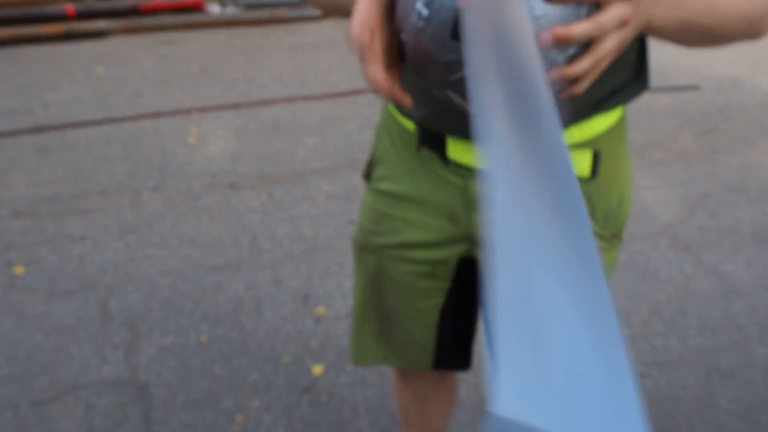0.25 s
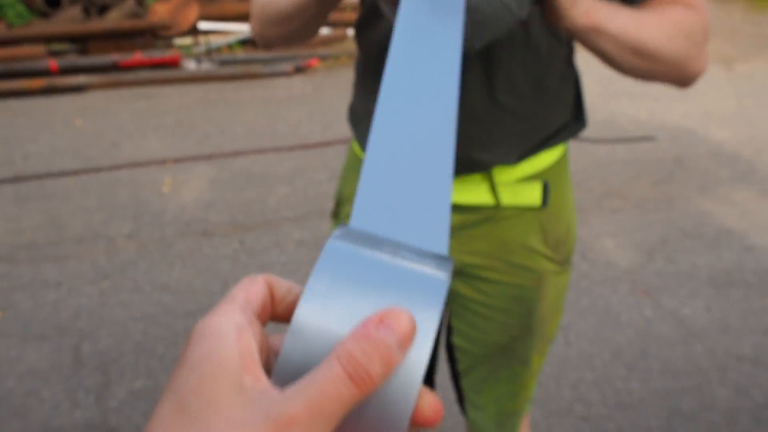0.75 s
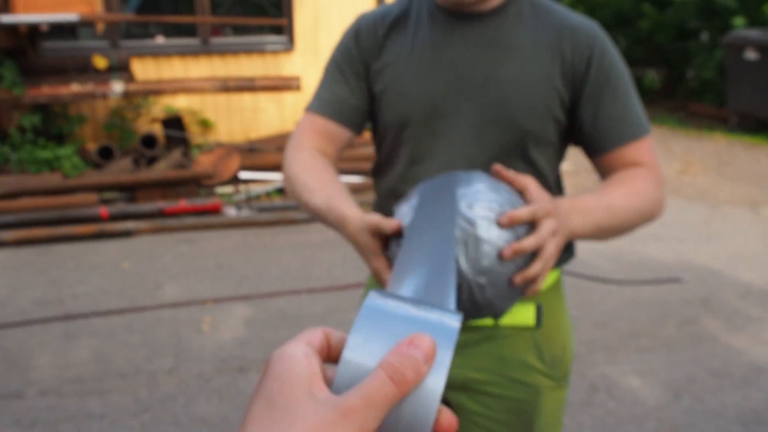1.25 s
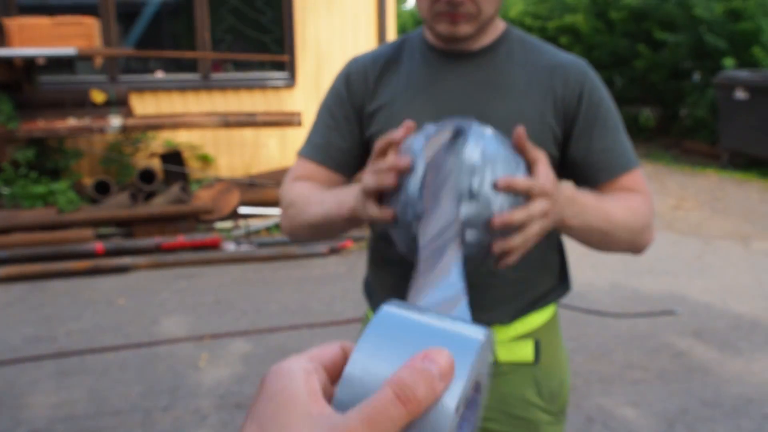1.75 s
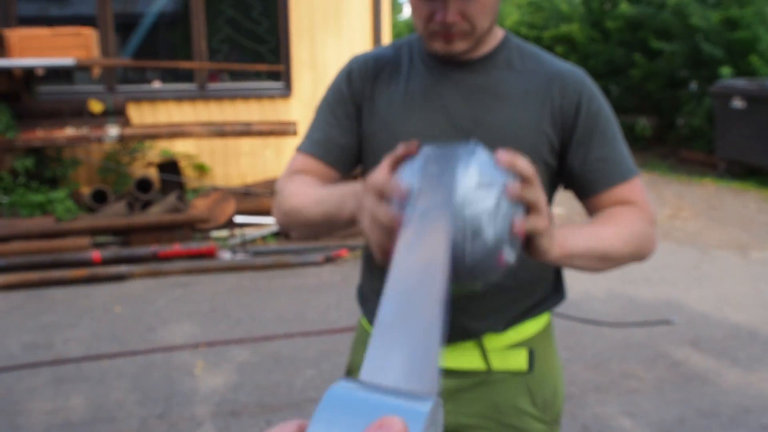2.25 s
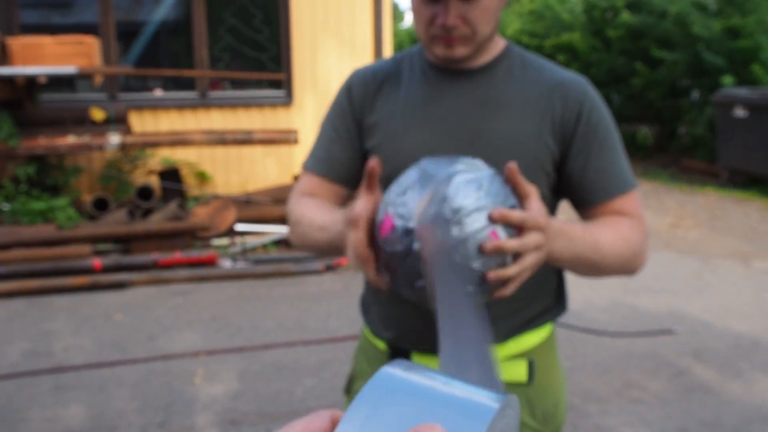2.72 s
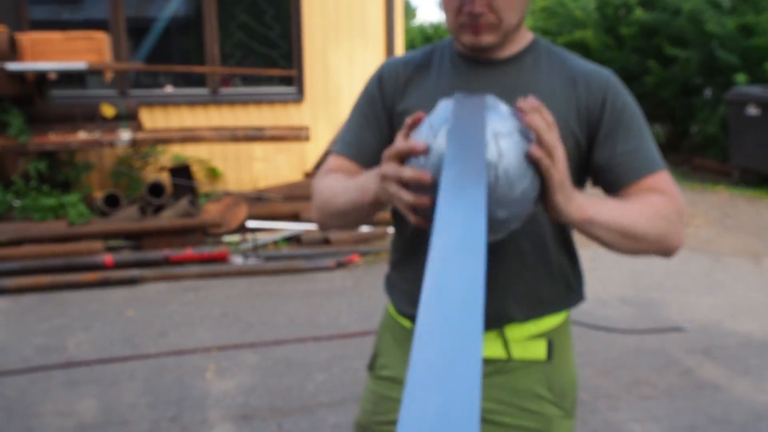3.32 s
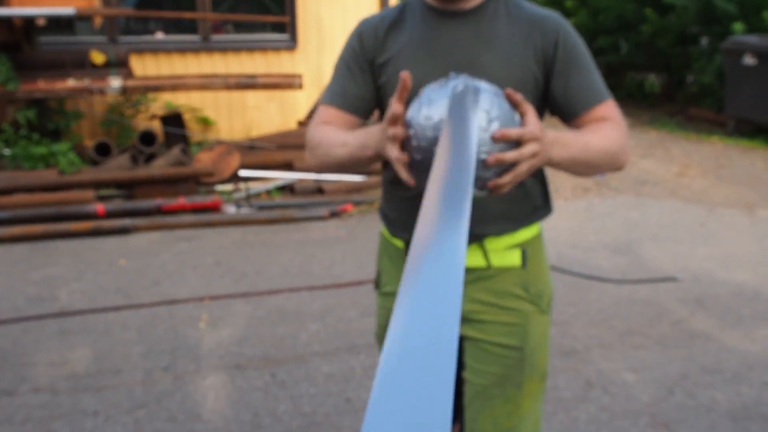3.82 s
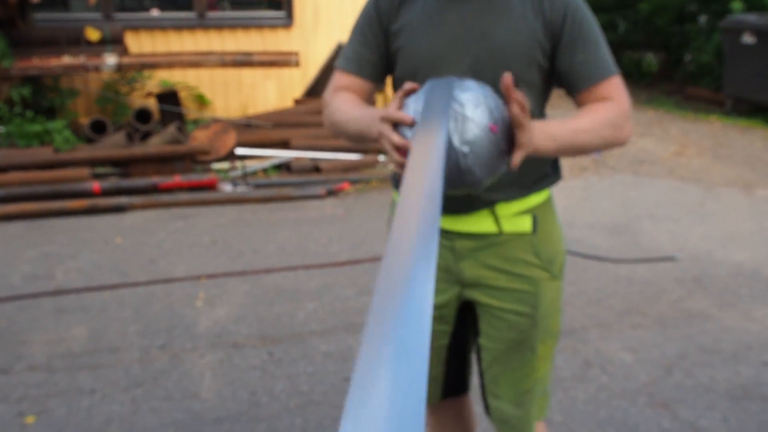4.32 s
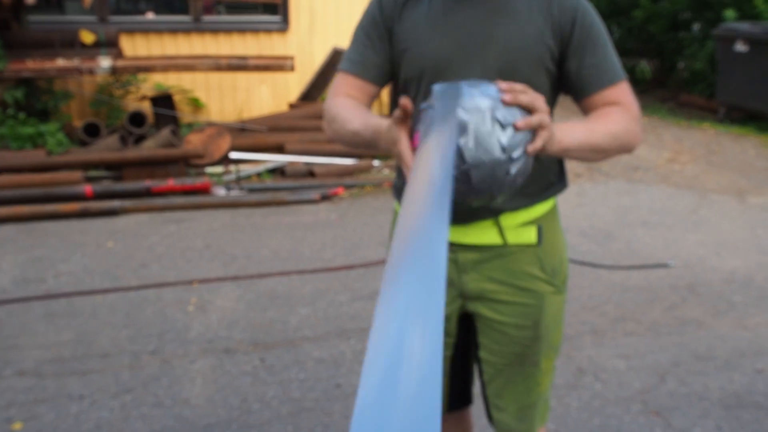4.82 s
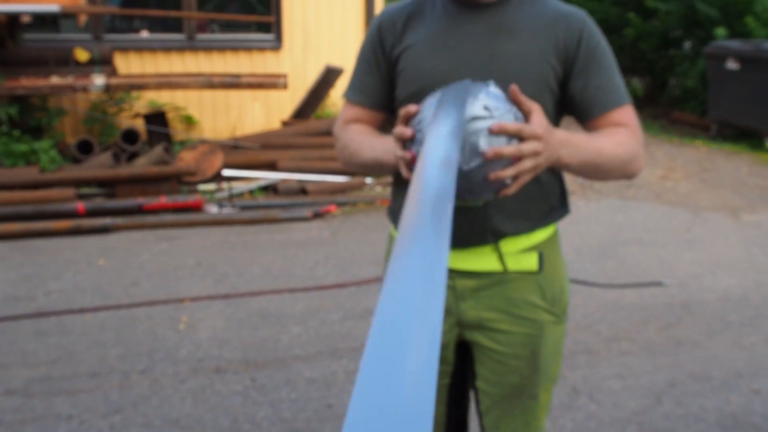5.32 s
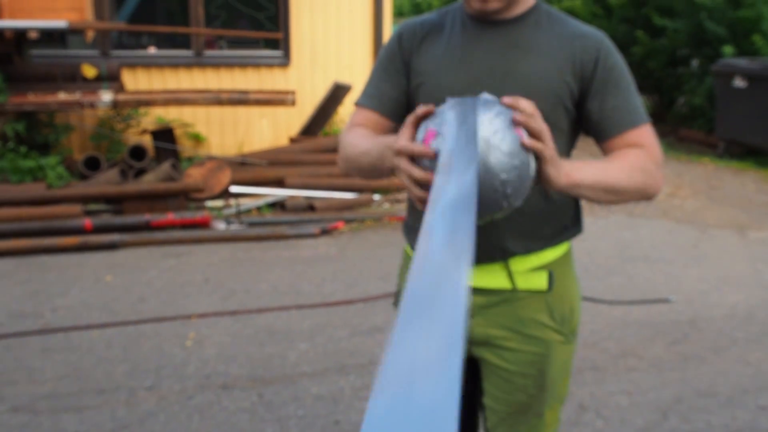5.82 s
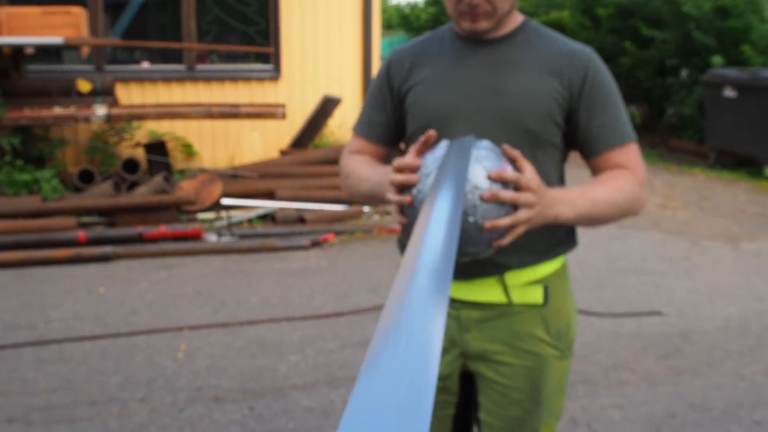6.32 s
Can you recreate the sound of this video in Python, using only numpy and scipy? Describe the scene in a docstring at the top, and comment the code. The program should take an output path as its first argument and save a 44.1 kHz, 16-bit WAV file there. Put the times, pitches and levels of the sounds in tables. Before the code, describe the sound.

Close, crackling rips of sticky tape being unrolled in bursts, over an engine that slows and pulls away and faint road noise.

```python
"""Outdoors, duct tape is pulled off a hand-held roll, close to a small stereo microphone.
The glue lets go in stick-slip bursts, each a tiny tear that shakes the taut strip; now and then
the slack strip snaps tight and rings the hollow roll. Behind it a motorcycle-like engine slows down,
then pulls away through a gear change, over the far roar of a road and a faint high whistle."""
import sys
import numpy as np
from scipy import signal
from scipy.io import wavfile

SR = 44100
rng = np.random.default_rng(int(sys.argv[2]) if len(sys.argv) > 2 else 0)


def unload_wav(signal):
    """Save mono or channel-first audio to the path in sys.argv[1] as 16-bit WAV at rate SR, clipped to [-1, 1]."""
    wavfile.write(
        sys.argv[1],
        SR,
        np.round(np.clip(np.atleast_2d(signal).T, -1, 1) * 32767).astype(np.int16),
    )


N = 289296
TIME = np.arange(N) / SR


def tape(tear_s, release_t60, colour_db, ring_db, ring_cycles, side_db, rise, crack_db, knock_db, hiss_db):
    """Each slip is a brief ragged tear that strikes every resonance of the strip with new strength."""
    # broad resonances of strip and roll: f/Hz, width/Hz, level/dB
    modes = [(191, 106, -1), (454, 59, 1.5), (830, 730, 1), (1435, 1290, 1), (2470, 440, 3), (3285, 436, 2),
             (4320, 950, -2.5), (6670, 1800, -5), (8700, 2580, -4.5), (14000, 3600, -10.5)]
    # the lows fall back as the free strip grows long: t/s, level/dB
    body = [(2.3, -0.5), (3.5, -1)]
    big_s, big_db = big_slips()
    small_at, small_db, motion = small_slips(big_s, uneven_db=2.5, reload_s=.004)
    at = np.append((big_s * SR).astype(int), small_at)
    level_db = np.append(big_db, small_db)
    thin_db = 1.04 * np.minimum(big_db + 18, 0)   # big slips under -18 dB hardly move the strip
    low_db = np.append(thin_db, np.zeros(len(small_at))) + in_time(body)[0][at]
    low_db += knock_db * rng.standard_normal(len(at))
    stop = at + (tear_s * SR * rng.uniform(0.68, 0.85, len(at))).astype(int)
    white = rng.standard_normal((2, N))
    ragged = amp(3.0 * rng.standard_normal(N // 8 + 1)).repeat(8)[:N]   # threads of glue part unevenly
    out = 0
    for k, (hz, width_hz, mode_db) in enumerate(modes):
        gain = amp(level_db + low_db * (hz < 2000) + colour_db * rng.standard_normal(len(at)))
        starts, ends = np.zeros((2, N))
        starts[at] = gain
        ends[stop] = gain
        crack = -amp(crack_db) * starts * [[1], [0]]   # a slip opens with one sharp jerk, dead centre
        tear = np.maximum(np.cumsum(starts - ends), 0) + dying(ends, release_t60)
        tear = signal.lfilter([rise], [1, rise - 1], tear)   # the tear takes a moment to run across
        ring = amp(ring_db) * dying(ends, .02 + ring_cycles / hz)   # the lows shake on for longer
        hiss = amp(hiss_db) * motion   # thin tearing under the small slips
        linger = amp(-5 * (hz > 5000)) * (ring + hiss)   # between slips the treble is damped
        mid, side = resonance(crack + white * (tear * ragged + linger), hz, width_hz)
        side *= amp(side_db + 3.5 * np.log2(hz / 4000))   # close mic ports differ only for short waves
        out += (-1) ** k * amp(mode_db + 5.0) * np.array([mid + side, mid - side])
    return out


def big_slips():
    """The glue line lets go in short, even runs; gives t/s and level/dB of each slip, faint lone ones included."""
    # runs of big slips: start t/s, slip count, spacing/ms, level/dB
    runs = [(0.2469, 1, 0, -23), (0.266, 2, 7.5, -18), (0.4865, 1, 0, -22), (0.533, 2, 11.5, -11),
            (0.5781, 2, 15.5, -14), (0.6066, 1, 0, -9), (0.6153, 3, 9, -10.5), (.651, 2, 8.5, -14),
            (0.6787, 4, 9, -11.5), (0.719, 1, 0, -19), (0.7406, 6, 8.5, -21), (1.3573, 3, 10, -14),
            (1.4203, 1, 0, -13), (1.4365, 3, 7.5, -12.5), (1.4848, 8, 9, -18.5), (1.5607, 2, 9.5, -23),
            (2.1969, 2, 12, -16.5), (2.2185, 2, 10, -14), (2.2667, 1, 0, -15.5), (2.2863, 3, 7.5, -14),
            (2.334, 3, 11, -14), (2.781, 2, 4.5, -20), (2.8037, 2, 33.5, -28.5), (3.1213, 2, 10.5, -16.5),
            (3.145, 2, 11.5, -12.5), (3.2178, 4, 8.5, -16.5), (3.27, 2, 11.5, -16), (3.2972, 2, 10, -16),
            (3.371, 2, 5.5, -15.5), (3.4521, 2, 17, -12.5), (3.5848, 3, 15.5, -17.5),
            (3.6417, 3, 14.5, -20), (3.842, 1, 0, -21), (3.8972, 2, 18, -17), (3.952, 5, 14, -17),
            (4.032, 3, 11, -15.5), (4.085, 5, 17.5, -17), (4.1648, 2, 13, -15.5), (4.1911, 3, 17, -15.5),
            (4.2686, 3, 15.5, -16), (4.4382, 2, 15, -14.5), (4.4903, 2, 11, -16), (4.546, 2, 12.5, -15.5),
            (4.59, 1, 0, -16.5), (4.8198, 2, 15, -14), (4.8776, 2, 18.5, -17.5), (5.007, 1, 0, -15),
            (5.043, 2, 15, -15), (5.1121, 1, 21, -17), (5.139, 2, 17, -16.5), (5.202, 2, 15.5, -14.5),
            (5.2371, 1, 0, -12), (5.2745, 4, 15.7, -16.5), (5.3615, 3, 22, -16), (5.46, 1, -6.5, -20),
            (5.6972, 2, 18, -12), (5.743, 2, 32, -28.5), (5.7897, 2, 16, -16), (5.85, 3, 14, -12),
            (5.883, 2, 11, -18.5), (5.9106, 1, -3.5, -15.5), (5.927, 3, 11, -19), (5.9588, 3, 8.5, -14.5),
            (6.0048, 3, 20, -17), (6.0808, 1, 8, -23.5)]
    # further lone slips, faint ones: t/s, level/dB
    faint_slips = [(0.18, -41), (1.2848, -39.5), (1.8845, -34), (2.733, -41), (3.0057, -35.5), (3.7151, -34),
                   (4.7645, -33), (6.235, -46)]
    slips = list(faint_slips)
    for start_s, count, spacing_ms, level_db in runs:
        for k in range(count):
            opening_db = -1.5 if k == 0 and count > 1 else 0   # a run opens with a weaker slip
            slips.append((start_s + k * spacing_ms / 1000, level_db + opening_db))
    return np.transpose(sorted(slips))


def small_slips(big_s, uneven_db, reload_s):
    """Nearly even small slips fade as the strain of the last big slip is spent."""
    last_big_s = big_s[np.maximum(np.searchsorted(big_s, TIME) - 1, 0)]
    pull_db, slips_per_s, slack_db_per_s = pulls()
    motion_db = pull_db - slack_db_per_s * np.maximum(TIME - last_big_s, 0)
    count = np.floor(np.cumsum(slips_per_s * amp(uneven_db * drift(60))) / SR)
    at = np.flatnonzero(np.diff(count))
    level_db = motion_db[at] + 0.48 * rng.standard_normal(len(at))
    gap_s = np.abs(TIME[at, None] - big_s).min(axis=1)
    sounding = (gap_s > reload_s) & (level_db > -100)   # the glue needs time to load again
    return at[sounding], level_db[sounding], amp(motion_db)


def pulls(top_share=0.74, fade_s=0.015):
    """Each pull keeps the strip moving: it swells to its top, then dies away into silence."""
    # pulls of the hand: start t/s, end t/s, top level/dB, slip rate/Hz, slackening/(dB/s)
    strokes = [(0.575, 0.8, -19.5, 140, 55), (1.36, 1.618, -17.5, 130, 95), (2.2, 2.431, -18, 160, 76),
               (3.122, 3.677, -20, 140, 6), (3.9, 4.323, -23, 120, 99), (4.439, 4.619, -26.5, 150, 250),
               (4.819, 4.927, -24, 150, 251), (5.01, 5.468, -24.5, 90, 201.5), (5.7, 6.095, -24.5, 90, 125)]
    level_db = np.full(N, -300.0)
    slips_per_s, slack_db_per_s = np.zeros((2, N))
    for start, end, top_db, rate, slack in strokes:
        pulling = (TIME > start) & (TIME < end + fade_s)
        corners_s = [start, start + top_share * (end - start), end, end + fade_s]
        level_db[pulling] = top_db + np.interp(TIME[pulling], corners_s, [-3.5, 0, -7, -35])
        slips_per_s[pulling] = rate
        slack_db_per_s[pulling] = slack
    return level_db, slips_per_s, slack_db_per_s


def snaps():
    """The slack strip snaps taut, and the jolt rings the hollow roll."""
    # jolts of the strip: t/s, level/dB
    hits = [(0.2703, -15.5), (0.2732, -11), (1.887, -26), (2.219, -23)]
    # hollow ring of the roll: f/Hz, width/Hz
    hollow = [(1150, 68), (1550, 270), (2450, 390)]
    jolts = np.zeros(N)
    for s, level_db in hits:
        jolts[int(s * SR)] = amp(level_db)
    bursts = dying(jolts, t60=0.028) * rng.standard_normal(N)
    return amp(10.0) * sum(resonance(bursts, hz, width_hz) for hz, width_hz in hollow)


def engine(waver, flutter_db, rasp_db):
    """Multiples of the cycle rate, shaped by firing pattern and exhaust; each firing also puffs noise."""
    # slowing, then pulling away: t/s, cycle rate/Hz, level/dB, low-note boost/dB
    ride = [(0, 60.65, -37.5, 7), (.55, 52.3, -34.5, 3), (1.0, 43.3, -39.5, -11), (1.3, 35.3, -35, -5.5),
            (1.8, 26.48, -42.5, 6), (2.12, 24.45, -36.5, 4), (2.59, 28.52, -35.5, 6), (3.0, 38.16, -22, 5),
            (3.22, 39.23, -24, 2.5), (3.49, 31.65, -32.5, 2), (3.62, 32.88, -27.5, 5.5),
            (4.4, 35.88, -26.5, 5.5), (5.2, 39.47, -25, 3), (5.65, 41.64, -22, -4.5),
            (5.9, 43.22, -26, -9.5), (6.15, 45.27, -23.5, -6.5), (6.56, 46.33, -23.5, 5)]
    # firing pattern: level/dB of multiples 1, 2, ...; the last holds for all higher ones
    firing_db = [-6, -4.5, -6.5, -3, -2, 0]
    # tone of the exhaust: f/Hz, level/dB
    exhaust = [(30, -33), (55, -7), (78, 3), (115, -4), (160, 0), (220, -5), (270, -19), (350, -36.5),
               (455, -17), (560, -52), (680, -23.5), (850, -58)]
    rate_hz, level_db, boost_db = in_time(ride)
    phase = 2 * np.pi * np.cumsum(rate_hz * (1 + waver * drift(8.08))) / SR
    drone = 0
    for k in range(1, 19):
        low_share = np.clip((115 - k * rate_hz) / 30, 0, 1)   # the boost fades in below 115 Hz
        gain_db = firing_db[min(k, len(firing_db)) - 1] + at_hz(exhaust, k * rate_hz)
        gain_db += low_share * boost_db + flutter_db * drift(4)
        drone += amp(gain_db) * np.sin(k * phase + .15 * k * k + .3 * drift(2))
    puffs = rng.standard_normal(N) * (1 + 0.4 * np.cos(phase))
    rasp = rms_one(steep(puffs, 398, 74))
    rasp += amp(10.5) * rms_one(steep(puffs, 169, 146))
    rasp += amp(-1.5) * rms_one(resonance(puffs, 510, 440))
    return amp(level_db) * (drone + amp(rasp_db) * rasp)


def whistle():
    """A faint, high, narrow band of noise that comes up near 2.9 s."""
    # swell of the whistle: t/s, level/dB
    swell = [(2.84, -78), (2.9, -57), (3.6, -63)]
    band = steep(rng.standard_normal((2, N)), hz=7000, width_hz=500)
    return amp(in_time(swell)[0]) * rms_one(band)


def road(roar_db, rumble_db):
    """A far road: a broad, gently shifting roar on a low rumble."""
    # far road roar as heard through the microphone, which dips near 5.5 kHz: f/Hz, relative level/dB
    roar = [(250, 12), (350, -20), (700, 0.5), (1100, 4), (1700, -5), (2300, -6.5), (4300, -11.5),
            (5500, -25), (7000, -12.5), (13000, -26), (17000, -21)]
    # low end of the road roar: f/Hz, relative level/dB
    rumble = [(20, -16), (50, -8), (200, -23), (330, -53)]
    return amp(roar_db) * road_bands(roar, swell_db=1.66) + amp(rumble_db) * road_bands(rumble, swell_db=2.5)


def road_bands(spectrum, swell_db):
    """Half-octave bands of noise, each with its own level, swell and stereo width; rms 1."""
    # stereo image of the road: f/Hz, left-right likeness (0 to 1)
    likeness = [(30, 0.24), (300, 1), (2000, 0.13), (12000, 0.041)]
    edges_hz = 25 * 2 ** np.arange(0, 9.6, .5)
    white = rng.standard_normal((2, 2, N))
    out = 0
    for k, (low, high) in enumerate(zip(edges_hz, edges_hz[1:])):
        hz = np.sqrt(low * high)
        if spectrum[0][0] < hz < spectrum[-1][0]:
            bandpass = signal.butter(2, [low, high], "band", fs=SR, output="sos")
            mid, side = signal.sosfilt(bandpass, white[k % 2])
            alike = at_hz(likeness, hz)
            gain = amp(at_hz(spectrum, hz) + swell_db * drift(3.1))
            out += gain * (np.sqrt(1 + alike) * mid + np.sqrt(1 - alike) * side * [[1], [-1]])
    return rms_one(out)


def amp(db):
    """Gain of a level in dB."""
    return 10 ** (np.asarray(db) / 20)


def rms_one(x):
    """Scale to rms 1."""
    return x / np.sqrt(np.mean(x ** 2) + 1e-20)


def in_time(rows):
    """Turn a table of timed points into one sample-by-sample curve per column."""
    s, *columns = np.transpose(rows)
    return [np.interp(TIME, s, column) for column in columns]


def at_hz(points, hz):
    """Read a spectrum on a log-frequency axis."""
    points_hz, values = np.transpose(points)
    return np.interp(np.log(hz), np.log(points_hz), values)


def drift(rate_hz):
    """Slow random wander of rms 1: noise twice through a one-pole low-pass."""
    hop = 40
    r = np.exp(-2 * np.pi * rate_hz * hop / SR)
    slow = signal.lfilter([1], [1, -2 * r, r * r], rng.standard_normal(N // hop + 2002))[2000:]
    return np.interp(np.arange(N) / hop, np.arange(len(slow)), rms_one(slow))


def dying(clicks, t60):
    """Each click jumps to its height and falls 60 dB in t60 seconds."""
    return signal.lfilter([1], [1, -amp(-60 / (t60 * SR))], clicks + 1e-18)


def resonance(x, hz, width_hz):
    """Two-pole peak of gain 1."""
    r = np.exp(-np.pi * width_hz / SR)
    feedback = [1, -2 * r * np.cos(2 * np.pi * hz / SR), r * r]
    return signal.lfilter(np.array([1, 0, -1]) * (1 - r * r) / 2, feedback, x)


def steep(x, hz, width_hz):
    """The same peak twice, for steeper flanks."""
    return resonance(resonance(x, hz, width_hz), hz, width_hz)


def scene():
    """Tape close in front, engine and road behind."""
    strip = tape(tear_s=0.0015, release_t60=0.001, colour_db=1.18, ring_db=-6.5, ring_cycles=18,
                 side_db=-10.5, rise=0.039, crack_db=10, knock_db=3, hiss_db=-17)
    motor = engine(waver=0.00646, flutter_db=1.6, rasp_db=-21)
    motor_left = amp(-0.5) * np.interp(TIME - .00018, TIME, motor)   # the engine sits a little to the right
    traffic = road(roar_db=-45.5, rumble_db=-50.5)
    front = (strip + snaps()) * amp([[-.3], [0]])
    return front + np.array([motor_left, motor]) + traffic + whistle()


def record(dry):
    """Soft clipping rounds the highest peaks; a steep low-pass cuts the top at 16.9 kHz."""
    rounded = .7 * np.tanh(dry / .7)
    return signal.sosfilt(signal.cheby2(12, 70, 16900, fs=SR, output="sos"), rounded)


dry = scene()
out = record(dry)
unload_wav(out)
```